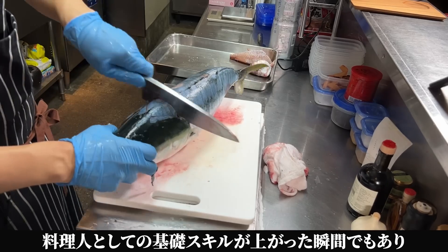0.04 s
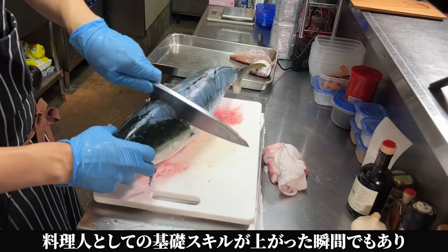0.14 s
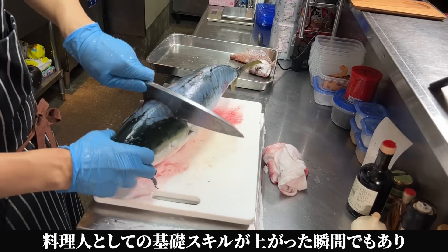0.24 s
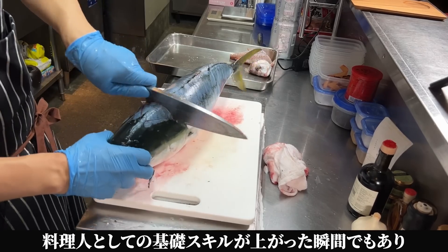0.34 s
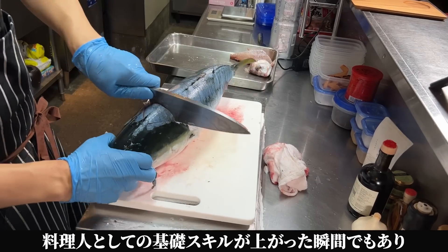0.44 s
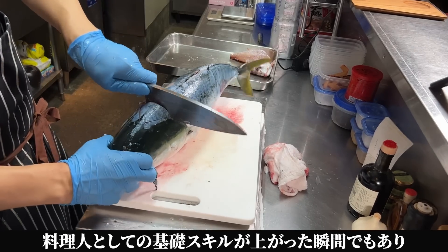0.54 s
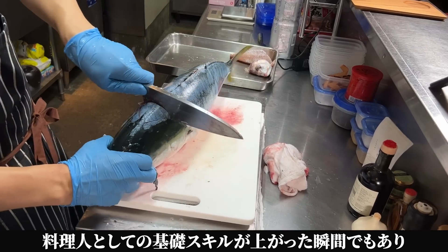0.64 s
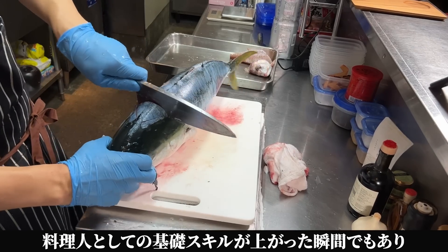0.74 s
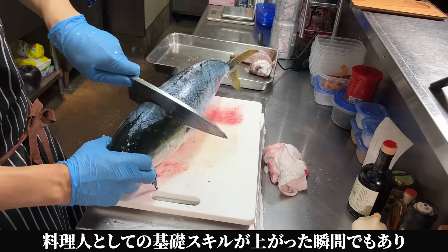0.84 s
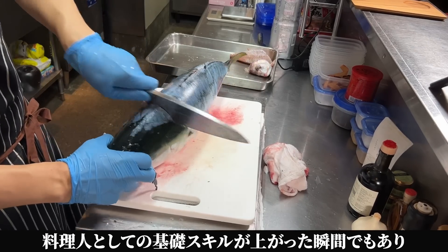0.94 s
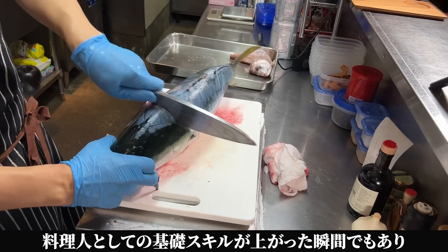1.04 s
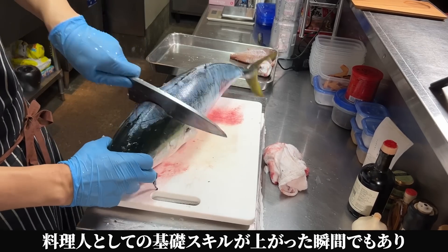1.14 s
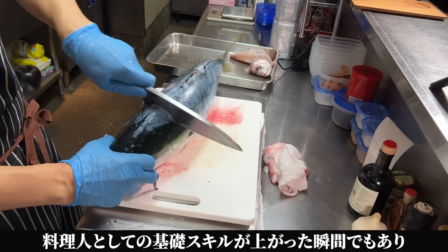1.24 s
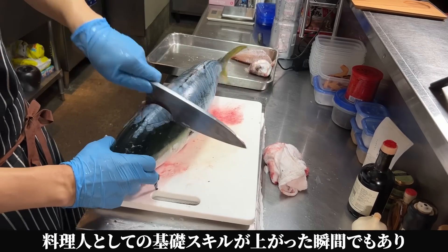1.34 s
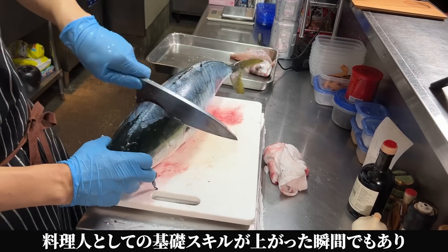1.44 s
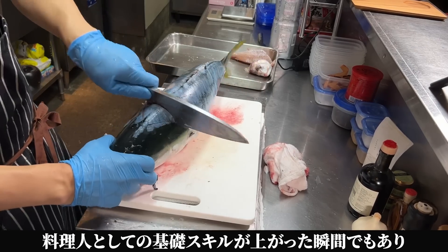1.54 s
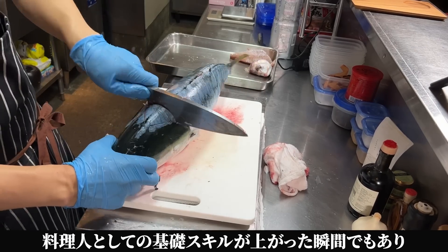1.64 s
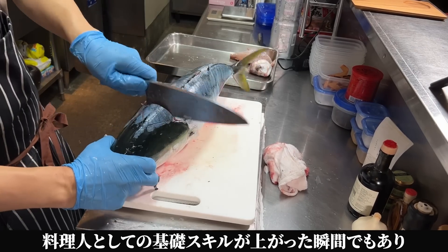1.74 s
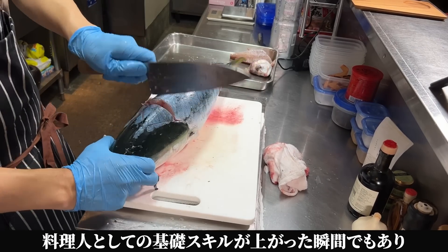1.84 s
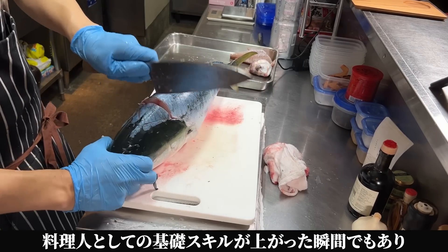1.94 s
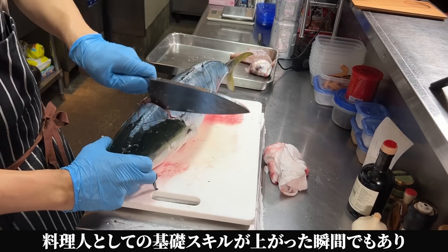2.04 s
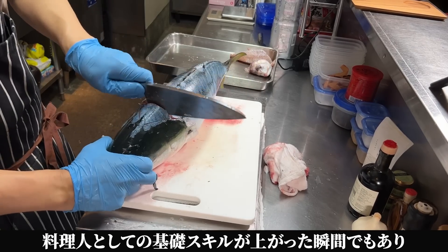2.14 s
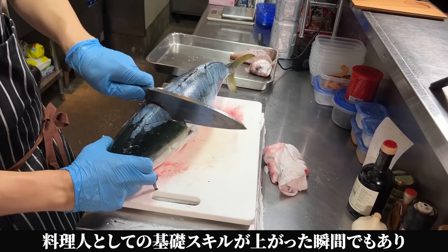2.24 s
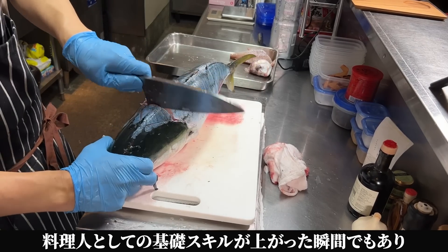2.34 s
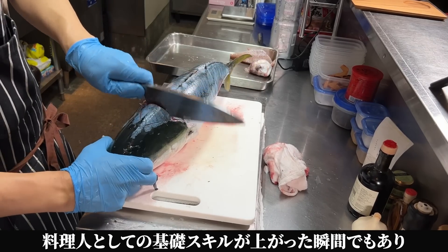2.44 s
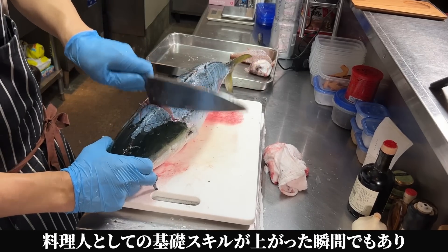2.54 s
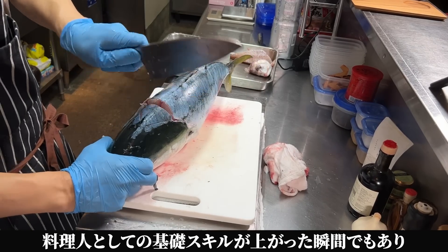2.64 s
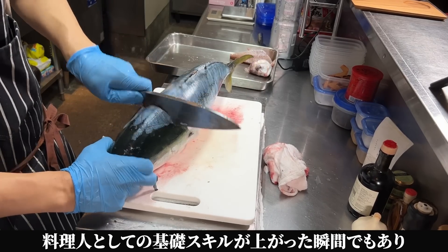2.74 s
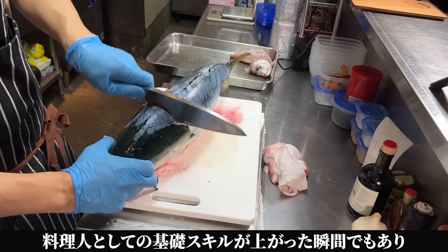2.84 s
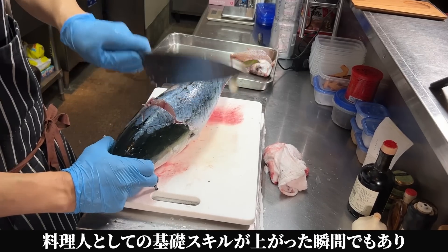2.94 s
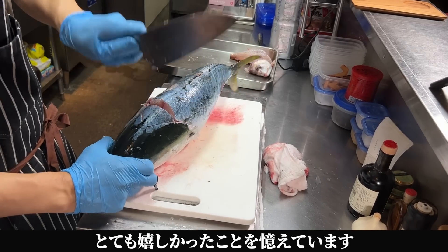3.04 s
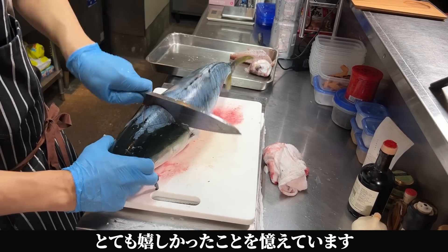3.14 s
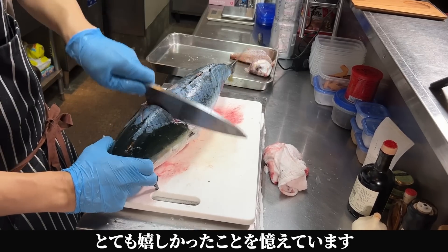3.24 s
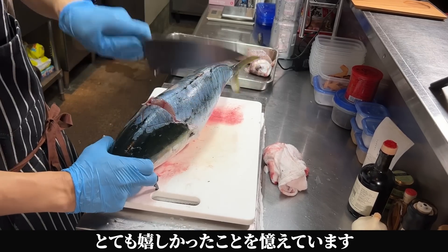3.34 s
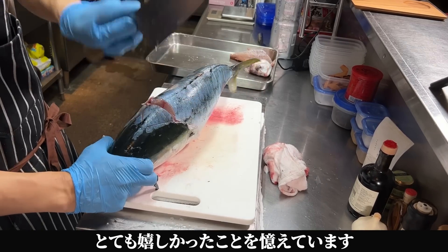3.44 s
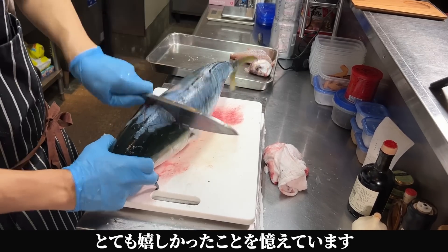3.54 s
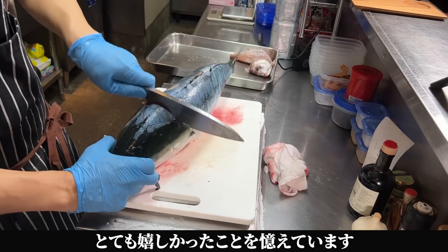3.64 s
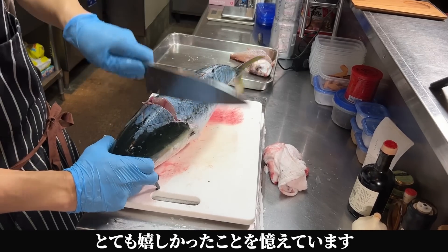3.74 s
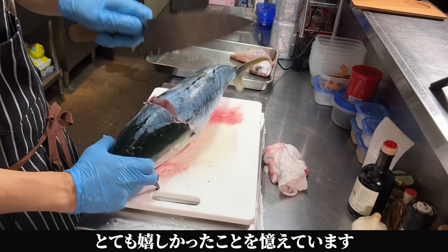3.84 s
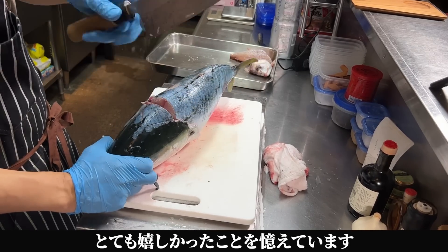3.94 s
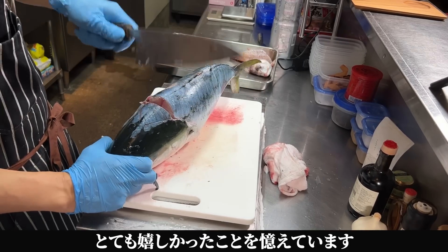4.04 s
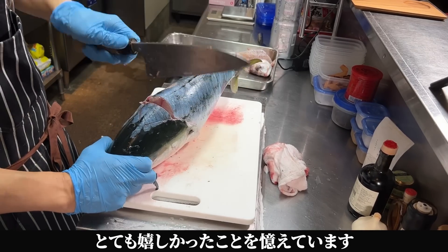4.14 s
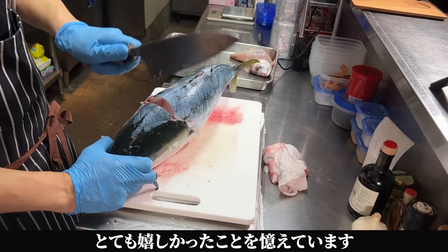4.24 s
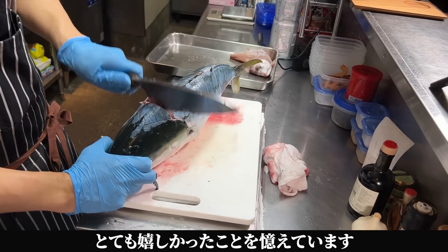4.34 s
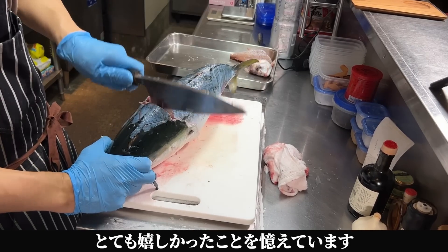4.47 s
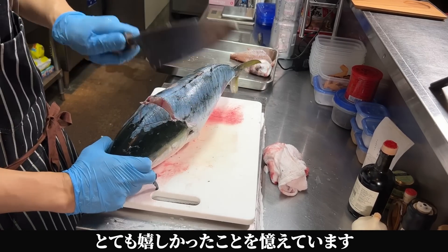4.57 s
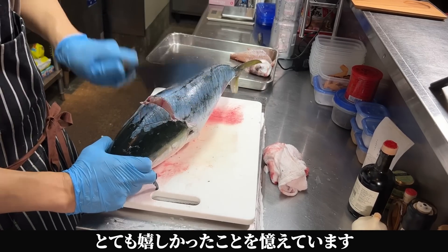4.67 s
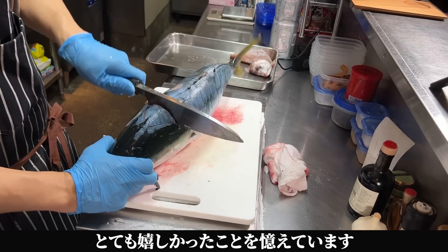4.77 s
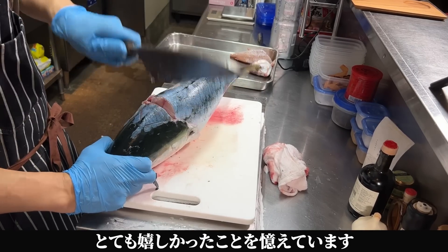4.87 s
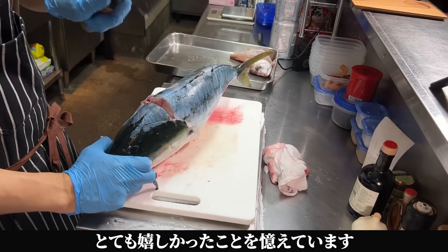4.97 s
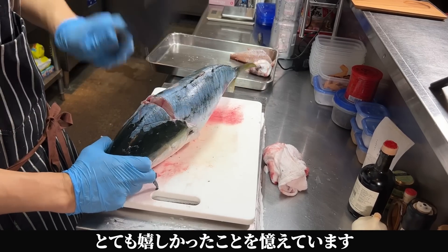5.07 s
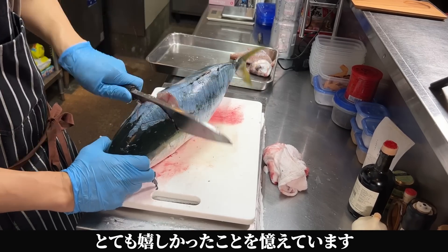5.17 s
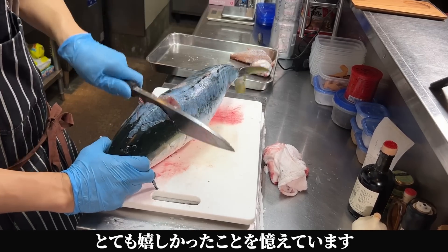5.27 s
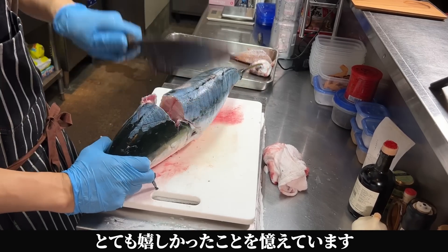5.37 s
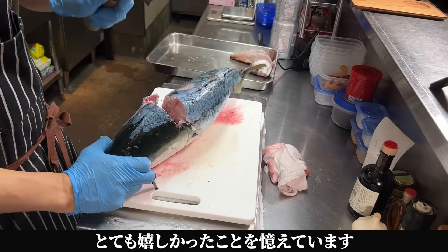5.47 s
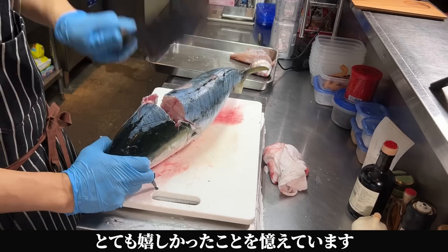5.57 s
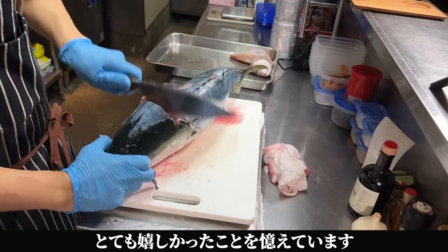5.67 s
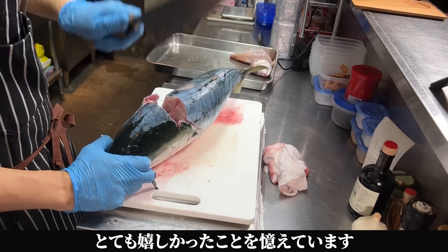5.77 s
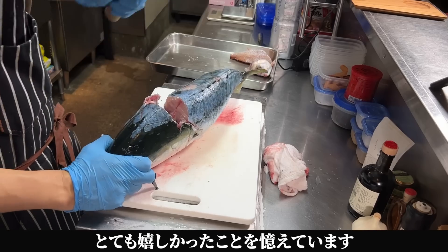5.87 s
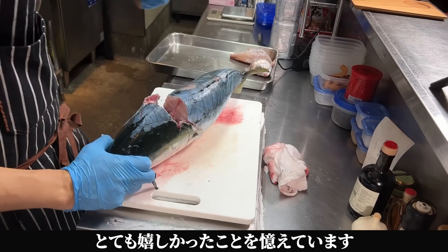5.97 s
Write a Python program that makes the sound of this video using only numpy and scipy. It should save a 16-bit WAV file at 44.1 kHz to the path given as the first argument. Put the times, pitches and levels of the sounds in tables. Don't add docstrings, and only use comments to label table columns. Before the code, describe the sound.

Close on a cutting board: quiet wet snags and skin rubs from a knife in fish for over two seconds, then three quickening chops, a pause with light scrapes and a soft set-down, and three more chops. Bone splinters crisply, the blade gives a damped metallic edge, the board knocks dully and rattles back onto a metal counter. Constant low hum and fan air fill the hard-walled kitchen.

```python
import sys
import numpy as np
from scipy import signal
from scipy.fft import rfft, irfft, next_fast_len
from scipy.io import wavfile
from scipy.ndimage import uniform_filter1d, map_coordinates

SR = 44100
rng = np.random.default_rng(int(sys.argv[2]) if len(sys.argv) > 2 else 0)


def file_out(sig):
    cols = np.atleast_2d(sig).T
    lim = np.clip(cols, -1, 1)
    pcm = np.round(lim * 32767).astype(np.int16)
    wavfile.write(sys.argv[1], SR, pcm)


def volts(x):
    e = np.asarray(x, float) / 20
    return 10 ** e


N = 265041

# start_s, thud_db, counter_bounce_db, counter_sway_db, edge_entering_flesh_db
STROKES = [
    (1.066, -39, -22, -26, -60),
    (2.742, -21.5, -18.5, -18.5, -18),
    (3.112, -12, -20, -14.5, -30),
    (3.516, -7.5, -14, -12, -14),
    (4.401, -46, -27, -21.5, -60),
    (4.703, -9.5, -15.5, -14.5, -19),
    (5.12, -13, -49, -18, -27),
    (5.637, -21.5, -22, -18.5, -23),
]
# freq_hz, level_db (per Hz)
SKIN = [(400, -37), (1000, -4), (2500, 1.5), (4700, 2.5), (7000, -1.5), (11000, -4), (15500, -4)]


def unit(x):
    return x / np.sqrt(np.mean(x ** 2) + 1e-20)


def along(points, hz):
    f, v = np.transpose(points)
    return np.interp(np.log(hz + 1), np.log(f + 1), v)


def wobble(rate):
    return map_coordinates(rng.standard_normal(N // 100), [np.arange(N) * rate / SR])


def filtered(x, response):
    m = next_fast_len(len(x) + 8192)
    return irfft(rfft(x, m) * response(np.fft.rfftfreq(m, 1 / SR)), m)[:len(x)]


def resonances(modes):
    def response(f):
        total = 0
        for k, (centre, width, db) in enumerate(modes):
            mode = 1j * f * width / (centre * centre - f * f + 1j * f * width)
            total = total + (-1) ** k * volts(db) * mode
        return total
    return response


def add(track, s, sound):
    part = track[round(s * SR):][:len(sound)]
    part += sound[:len(part)]


def burst(t60, rise, spiky_db):
    t = np.arange(SR // 5) / SR
    noise, sizes = rng.standard_normal((2, len(t)))
    splinters = volts(spiky_db * unit(uniform_filter1d(sizes, size=24)))
    shape = volts(-60 * t / max(t60, .002)) * (1 - np.exp(-t / rise))
    spectrum = rfft(unit(noise * splinters) * shape)
    flat = spectrum / np.sqrt(uniform_filter1d(np.abs(spectrum) ** 2, size=60) + 1e-9)
    even = irfft(flat, len(t)) * shape / (shape + .03)
    return even * np.linalg.norm(shape) / np.linalg.norm(even)


def equipment():
    # pitch_hz, level_db, pitch_wander_hz
    motor_lines = [(18.3, -35.5, 3.4), (28.2, -52, 4), (76, -42, 1.4), (147.2, -53, 1.05),
                   (295.5, -52.5, .3), (488.5, -48.5, .3), (624, -53, 0.776), (882, -53.5, 1.05)]
    # freq_hz, level_db (per Hz)
    fan_colour = [(40, -8), (100, 0), (140, 2.5), (215, -4.5), (450, -5), (900, -5.5), (1650, -9.5),
                  (2000, -14), (2900, -15.5), (4500, -25.5), (7100, -35), (9000, -38), (12800, -34.5),
                  (15800, -40)]
    # pitch_hz, width_hz, level_db
    sizzle_peaks = [(12700, 900, 0), (13100, 300, -2), (13900, 400, -3), (11600, 400, -13)]
    # peak_s, db_over_rest, rise_s, fall_s
    sizzle_swells = [
        (.3, 9, .06, 0.41),
        (1.13, 8, .12, .1),
    ]
    hum_hz, rush_db, sizzle_rest_db = 48.977, -37, -67.5
    t = np.arange(N) / SR

    hum = volts(-15.5 + 0.19 * wobble(6.8)) * np.cos(2 * np.pi * hum_hz * t + 0.44)
    lines = np.zeros(N)
    for hz, db, wander_hz in motor_lines:
        level = volts(db + 2.8 * wobble(4.114))
        phase = 2 * np.pi * np.cumsum(hz + wander_hz * wobble(3)) / SR
        lines += level * np.sin(phase)

    z = signal.stft(rng.standard_normal(N), nperseg=512)[2]
    field = uniform_filter1d(rng.standard_normal(z.shape), size=6, axis=0)
    field = uniform_filter1d(field, size=12, axis=1)
    patchy = signal.istft(z * volts(0.86 * unit(field)), nperseg=512)[1][:N]
    rush = unit(filtered(patchy, lambda f: volts(along(fan_colour, f))))

    sizzle_db = np.full(N, sizzle_rest_db)
    for s, db, rise, fall in sizzle_swells:
        sizzle_db += db * np.clip(1 - np.maximum((s - t) / rise, (t - s) / fall), 0, 1)
    peaks = resonances(sizzle_peaks)
    sizzle = unit(filtered(rng.standard_normal(N), lambda f: peaks(f) ** 2)) * volts(2.3 * wobble(12))
    return hum + lines + volts(rush_db) * rush + volts(sizzle_db) * sizzle


def kitchen(x):
    # freq_hz, t60_s
    tile_decay = [(150, 1), (700, 0.35), (1800, 0.36), (5000, 0.36), (13000, 0.25)]
    out, stretch = np.zeros(N), SR // 3
    for start in range(0, N, stretch):
        hz, t, z = signal.stft(rng.standard_normal(SR // 2), SR, nperseg=256)
        decay = volts(-60 * t / along(tile_decay, hz)[:, None])
        tail = signal.istft(z * decay, SR, nperseg=256)[1]
        echo = signal.fftconvolve(x[start:start + stretch], tail / np.linalg.norm(tail))
        add(out, start / SR + .004, echo)
    return out


def counter():
    # pitch_hz, level_db, t60_s
    thud_modes = [(108.5, -3, 0.35), (132, 8.5, 0.12), (152.7, 0, 0.26), (180, -2.5, 0.16),
                  (268, -2.5, 0.054), (355, -4.5, 0.048), (414, -33.5, 0.33)]
    # freq_hz, level_db (per Hz)
    fish_colour = [(60, -26), (110, -39), (200, 3.5), (320, -1.5), (480, -3), (800, -34)]
    out, t = np.zeros(N), np.arange(SR) / SR

    def swell(peak_s):
        return t / peak_s * np.exp(1 - t / peak_s)

    for s, thud_db, bounce_db, sway_db, _ in STROKES:
        thud = np.zeros(SR)
        scatter_db = rng.normal(0, 1.34, len(thud_modes))
        for (hz, db, t60), d in zip(thud_modes, scatter_db):
            thud += volts(db + d - 60 * t / t60) * np.sin(2 * np.pi * hz * t)
        add(out, s + 0.0138, volts(thud_db - 8.5) * thud * (1 - np.exp(-t / 0.0026)))

        slap = filtered(burst(0.23, rise=0.002, spiky_db=1.5), lambda f: volts(along(fish_colour, f)))
        add(out, s + 0.00605, volts(thud_db + 10) * slap)

        bounce = swell(0.024) * np.sin(2 * np.pi * 52 * t)
        add(out, s + 0.013, volts(bounce_db) * bounce)

        sway = swell(.06) * np.sin(2 * np.pi * 18 * t)
        sway += volts(-6) * swell(.035) * np.sin(2 * np.pi * 32 * t)
        add(out, s + 0.0515, volts(sway_db) * sway)
    return out


def rubbing():
    # loudest_s, level_db, rise_s, fall_s
    drag_strokes = [
        (.93, -45, .05, .06),
        (1.11, -43, 0.12, .035),
        (1.23, -51, .15, .03),
        (1.5, -49, .07, .1),
        (2.735, -36, 0.023, .022),
        (3.93, -51, .2, .1),
        (3.985, -45.5, 0.073, .055),
        (4.385, -48, .015, 0.094),
        (5.28, -51, .12, 0.13),
    ]
    range_db = 27
    t, power = np.arange(N) / SR, np.zeros(N)
    for s, db, rise, fall in drag_strokes:
        power += volts(db - range_db * np.maximum((s - t) / rise, (t - s) / fall)) ** 2
    slips = rng.standard_normal(N) * volts(1.4 * wobble(160) + 2.6 * wobble(430))
    return np.sqrt(power) * unit(filtered(slips, lambda f: volts(along(SKIN, f))))


def ticks():
    # start_s, peak_db, pitch_hz
    scale_snaps = [(.474, -34, 5500), (.563, -36, 4670), (.867, -46, 10000), (.936, -33, 5000),
                   (.985, -38, 9500), (.994, -30, 5000), (1.036, -40, 6500), (1.1, -36, 4700),
                   (1.16, -35, 5000), (1.164, -40, 7500), (1.189, -39, 13000), (1.275, -45, 10500),
                   (1.565, -35, 4860), (1.676, -42, 8500), (3.232, -30, 3500), (3.821, -36, 7700),
                   (3.916, -35, 5200), (4.06, -44, 8000), (4.108, -44, 9000), (4.25, -46, 9500),
                   (4.38, -30, 7200), (5.953, -44, 8000)]
    # start_s, peak_db, pitch_hz, body_re_peak_db, blade_ping_db
    skin_snags = [
        (.921, -22, 4470, 3.5, -19),
        (.927, -36, 10500, -9, -14),
        (1.069, -38, 13500, 15, -24),
        (1.13, -55, 12700, -9, 15),
        (1.5002, -33.5, 5900, 15, -2),
        (2.458, -33.5, 5000, -1, -10),
        (4.378, -22, 4360, 1, -40),
    ]
    scale_body_db, scale_ping_db, scale_t60_s, snag_t60_s = 0, -20, 0.015, 0.021
    out = np.zeros(N)
    snaps = [(*row, scale_body_db, scale_ping_db, scale_t60_s) for row in scale_snaps]
    snaps += [(*row, snag_t60_s) for row in skin_snags]
    for s, db, hz, body_db, ping_db, t60 in sorted(snaps):
        colour = resonances([(hz, 0.35 * hz, 0), (1800, 1200, body_db - 5.5),
                             (9700, 40, ping_db + 17), (12750, 60, ping_db + 14)])
        snap = filtered(burst(t60, rise=0.00057, spiky_db=5.5), colour)
        add(out, s - .0005, volts(db + 4.5) * snap)
    return out


def entering():
    out, t = np.zeros(N), np.arange(SR // 50) / SR
    for s, *_, db in STROKES:
        hiss = unit(filtered(rng.standard_normal(len(t)), lambda f: volts(along(SKIN, f))))
        add(out, s - t[-1], volts(db - 3500 * t[::-1]) * hiss)
    return out


def shards():
    # start_s, peak_db, pitch_hz, t60_s
    bone_pieces = [(1.5, -32, 1880, .015), (2.739, -16, 762, 0.024), (2.741, -19, 3980, 0.017),
                   (2.7496, -10.5, 1560, 0.0094), (3.114, -10, 5180, 0.012), (3.12, -18, 2800, 0.038),
                   (3.232, -34, 3460, .015), (3.517, -2, 2530, 0.021), (3.559, -27, 1530, 0.034),
                   (4.436, -24.5, 2560, 0.024), (4.702, -12.5, 4160, 0.0094), (4.768, -23.5, 337, 0.027),
                   (5.119, -7.5, 2290, 0.036), (5.121, -5, 4260, 0.02), (5.6375, -8.5, 3570, 0.023),
                   (5.639, -16.5, 2780, .04), (5.699, -24, 2660, 0.011)]
    out = np.zeros(N)
    for s, db, hz, t60 in bone_pieces:
        ring = resonances([(hz, 0.2 * hz, 0)])
        note = filtered(burst(t60, rise=0.00028, spiky_db=4.5), lambda f: ring(f) ** 2)
        add(out, s, volts(db) * note / np.abs(note).max())
    return out


def chops():
    # start_s, crack_peak_db, knock_re_crack_db, edge_re_crack_db, knock_pitch_hz
    bone_cracks = [(2.7362, -18.5, 3, -5, 775), (2.7415, -9.5, -1, -5.5, 1110),
                   (3.1114, -2.5, -3, -7.5, 1110), (3.1168, -12, -4, -5, 1620), (3.121, -13, -22, -12, 990),
                   (3.5119, -10.5, -1, -2.5, 880), (3.5156, 0, 0, -12, 1140), (3.525, -3.5, -1.5, -14, 790),
                   (4.7033, -2, 0, -9, 870), (4.7093, -1.5, -11, -21, 1590), (5.118, 6, -3.5, -6.5, 900),
                   (5.1233, 5, -7, -23, 780), (5.1343, -18, -8, -23, 900), (5.6501, -12, -10, -5, 1450)]
    clean_snaps = [
        (2.7502, -9.5, 2, -13, 1500),
        (5.1596, -10, 3.5, -21, 1460),
        (5.6379, 3, -12.5, -9, 1240),
        (5.698, -13, -1.5, -32, 1040),
    ]
    # start_s, peak_db, knock_pitch_hz
    board_rebounds = [(2.7736, -22, 1090), (2.7944, -23, 1020), (3.1404, -18.5, 890), (3.1558, -18, 1250),
                      (3.1654, -19, 1000), (3.556, -10, 1020), (3.5606, -21, 1310), (3.571, -10.5, 730),
                      (3.588, -21, 1270), (4.426, -27.5, 1080), (4.4384, -24.5, 1010), (4.4514, -30, 955),
                      (4.726, -12, 750), (4.7436, -10.5, 900), (4.7572, -14, 1060), (4.7735, -19.5, 1160),
                      (5.1724, -18, 900), (5.674, -21, 1140), (5.773, -33, 1027), (1.062, -34, 800),
                      (1.078, -32, 620)]
    # freq_hz, level_db (per Hz)
    bone_colour = [(530, -41), (900, -16.5), (1780, -11), (2780, -4), (3440, -5.5), (4120, -9.5),
                   (5300, -13), (8260, -18), (11000, -16), (15800, -27)]
    # pitch_hz, width_hz, level_db
    blade_modes = [(2290, 380, -15), (2835, 16, 12.5), (3240, 14, -11), (4260, 110, -3), (4800, 220, -4),
                   (5000, 26, -7), (5500, 140, -9), (6880, 150, 3.5)]
    crack_t60_s, snap_t60_s, rebound_t60_s = 0.023, 0.014, 0.041
    crack_rise_s, rebound_rise_s = .0006, 0.0013
    rebound_knock_db, rebound_edge_db = 1, -19

    contacts = [(*row, crack_t60_s, crack_rise_s) for row in bone_cracks]
    contacts += [(*row, snap_t60_s, crack_rise_s) for row in clean_snaps]
    contacts += [(s, db, rebound_knock_db, rebound_edge_db, hz, rebound_t60_s, rebound_rise_s)
                 for s, db, hz in board_rebounds]
    steel = resonances(blade_modes * np.array([1, 2.2, 1]))
    near, blows = np.zeros((2, N))
    for s, db, knock_db, edge_db, hz, t60, rise in sorted(contacts):
        snap = burst(1.01 * t60, rise=rise, spiky_db=5.5)
        knock = burst(0.9 * t60, rise=0.00096, spiky_db=5.5)
        sharpness = [(3300, 0), (7500, edge_db + 10.5)]
        board_db = db + knock_db
        bone = lambda f: volts(db + 6 + along(bone_colour, f) + along(sharpness, f))
        blade = lambda f: volts(db - 2.5 + along(sharpness, f)) * steel(f)
        board = resonances([(hz, 150, board_db + 17.5), (765, 60, board_db + 14),
                            (1.29 * hz, 500, board_db + 7.5), (590, 120, board_db + 5.5)])
        dull_board = lambda f: board(f) / (1 + 1j * f / 4000)
        add(near, s - .0005, filtered(snap, bone) + filtered(snap, blade) + filtered(knock, dull_board))

        blow = np.linalg.norm(snap) * signal.unit_impulse(SR // 20, SR // 200)
        add(blows, s - 1 / 200, filtered(blow, bone) + volts(-2.5) * filtered(blow, board))
    return near, blows


def scene():
    around = equipment() + counter()
    small = rubbing() + ticks()
    pieces = shards()
    near, blows = chops()
    knife = near + small + entering() + pieces
    walls = volts(-7.5) * kitchen(blows) + volts(-9) * kitchen(small) + volts(-12) * kitchen(pieces)
    return (around + knife + walls)[None]


def low_pass(x):
    return signal.sosfilt(signal.butter(12, 15920, fs=SR, output="sos"), x)


def record(dry):
    top_hz, overload = 15950, 1.2
    squashed = dry[0] / (1 + np.abs(dry[0] / overload) ** 6) ** (1 / 6)
    mix = filtered(squashed, lambda f: volts(-45 * (f > top_hz)))[None]
    return low_pass(mix)


dry = scene()
out = record(dry)
file_out(out)
```